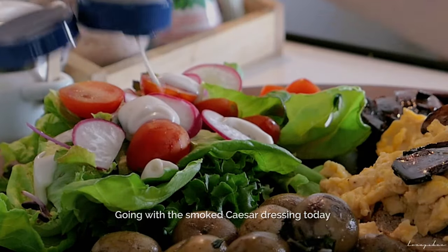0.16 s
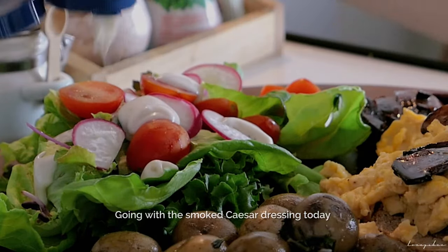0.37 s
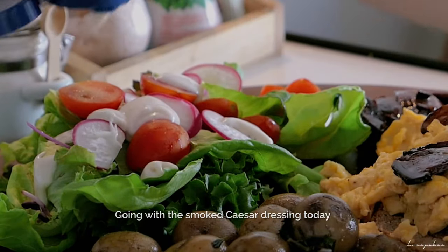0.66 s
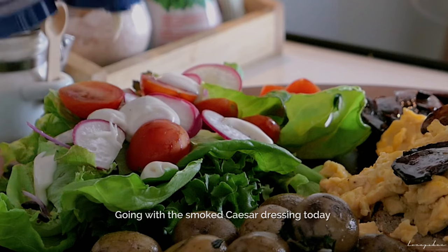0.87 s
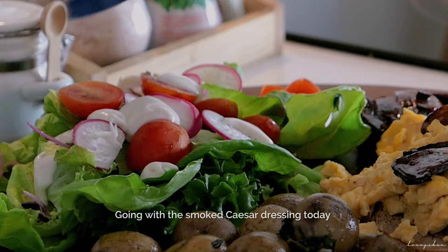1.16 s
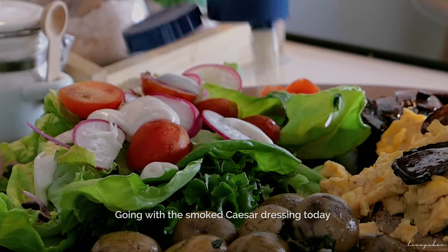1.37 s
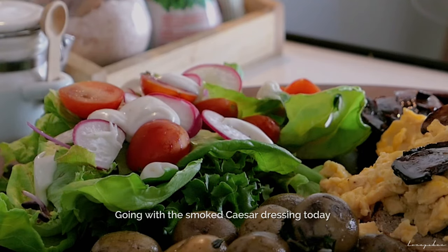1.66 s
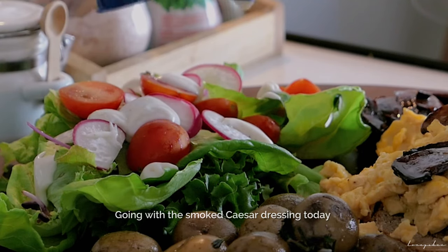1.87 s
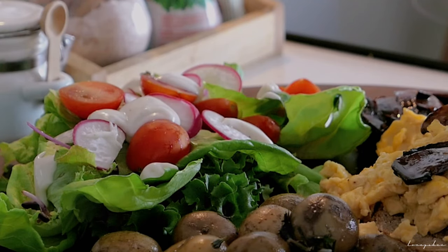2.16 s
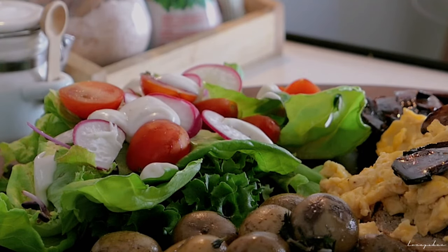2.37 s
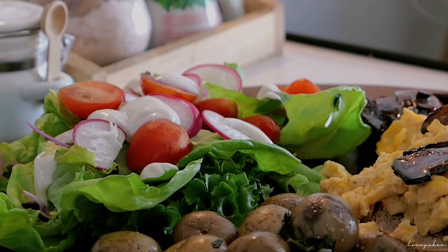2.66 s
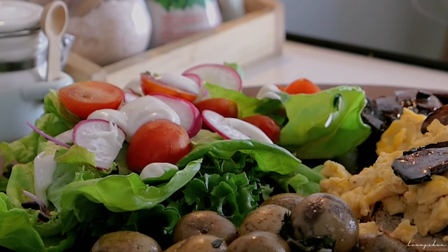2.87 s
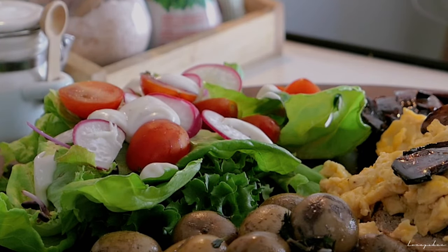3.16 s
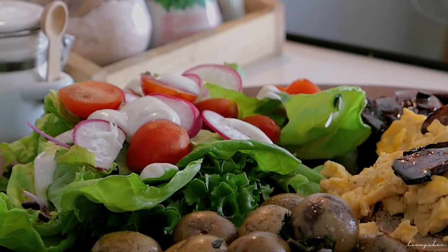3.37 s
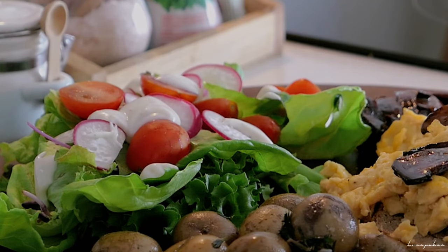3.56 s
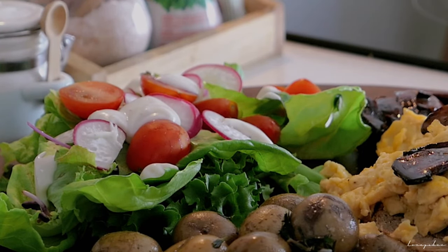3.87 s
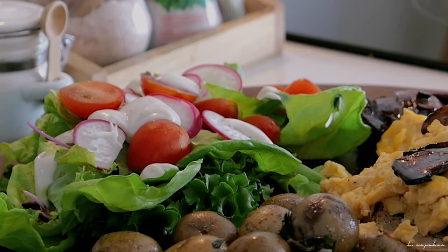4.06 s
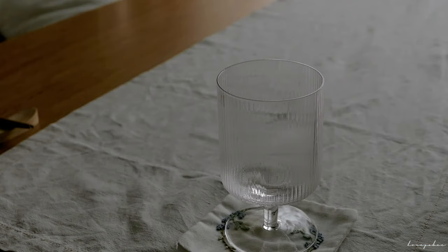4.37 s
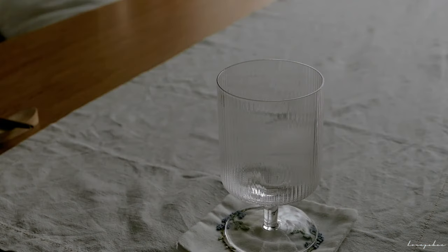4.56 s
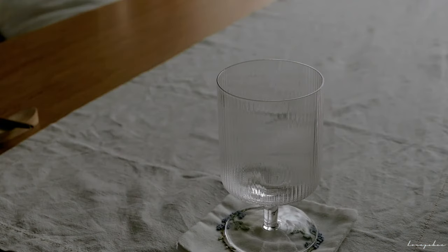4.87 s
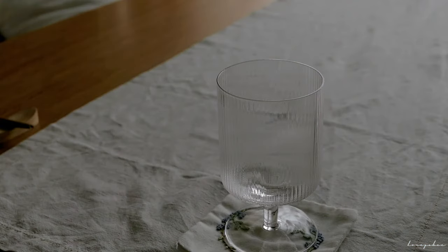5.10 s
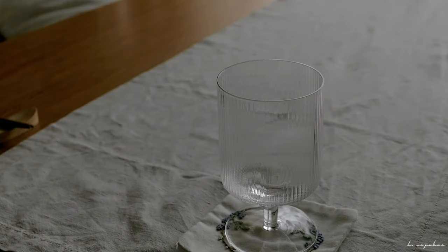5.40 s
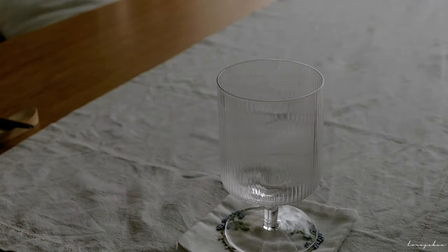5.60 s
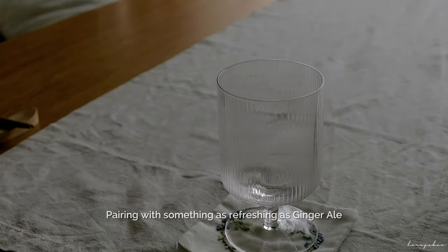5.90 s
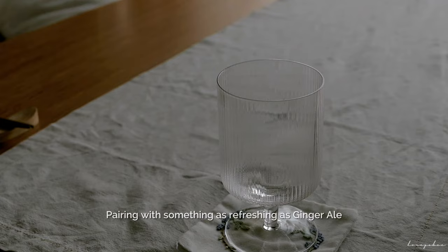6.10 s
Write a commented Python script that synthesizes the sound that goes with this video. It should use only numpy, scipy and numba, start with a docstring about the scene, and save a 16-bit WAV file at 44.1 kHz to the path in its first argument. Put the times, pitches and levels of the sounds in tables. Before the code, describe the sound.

A nearly empty squeeze bottle spits air and sauce in short wet bursts, with soft hollow thumps and one quick dish clink. The spurts thin out into a faint rustle. After two dull handling thuds, a drink can cracks open sharply, gas hisses and whistles out, the seal tears and the can knocks hollowly. Everything is close, in a hard, slightly ringing kitchen with a low fridge hum.

```python
"""Over a fridge's hum and whine, a nearly empty squeeze bottle spits air and sauce through its nozzle.
Its soft walls thump the air pocket inside, a dish clinks, and a soft rustle follows.
After two handling thuds a drink can is opened: the tab cracks the lid, gas hisses and whistles out,
the seal tears and the can knocks hollow. The hard kitchen rings on after every sharp sound."""
import sys
import numpy as np
from scipy import signal
from scipy.fft import rfft, irfft
from scipy.io import wavfile
from scipy.ndimage import uniform_filter1d
from numba import njit

SR = 44100
rng = np.random.default_rng(int(sys.argv[2]) if len(sys.argv) > 2 else 0)


def wav_record(signal):
    """Record a signal, one row per channel, as 16-bit PCM in the file named by sys.argv[1]."""
    frames = np.transpose(np.atleast_2d(signal))
    bounded = np.clip(frames, -1, 1)
    # unit amplitude maps onto the largest positive 16-bit level
    quanta = np.round(bounded * 32767).astype(np.int16)
    wavfile.write(sys.argv[1], SR, quanta)


N = 275184
T = np.arange(N) / SR


def undb(db):
    """Decibels to gain."""
    return 10 ** (np.asarray(db) / 20)


def unit(x):
    """Scale to rms 1."""
    return x / np.sqrt(np.mean(x ** 2))


def along(table, hz):
    """Interpolate a table over log frequency."""
    table_hz, values = np.transpose(table)
    return np.interp(np.log(hz), np.log(table_hz), values)


def pan(pan_db):
    """Stereo gains; pan_db is left minus right."""
    return undb([[pan_db / 2], [-pan_db / 2]])


def add(out, x, start_s, peak_db, pan_db):
    """Mix in a sound at its time, peak level and side."""
    i = int(start_s * SR)
    x = x[:N - i] / np.abs(x).max()
    out[:, i:i + len(x)] += x * undb(peak_db) * pan(pan_db)


@njit
def svf(x, hz, width_hz):
    """State-variable band-pass, gain 1 at the centre."""
    y, band_state, low_state = np.empty(len(x)), 0., 0.
    for i in range(len(x)):
        g, damping = np.tan(np.pi * hz[i] / SR), width_hz[i] / hz[i]
        v = (band_state + g * (x[i] + 1e-18 - low_state)) / (1 + g * (g + damping))
        band_state = 2 * v - band_state
        low_state += 2 * g * v
        y[i] = damping * v
    return y


def band(x, hz, width_hz):
    """Band-pass with fixed or moving centre."""
    return svf(x, np.clip(hz + 0 * x, 20, SR / 2.2), width_hz + 0 * x)


def steep(x, hz, width_hz):
    """The same band-pass twice."""
    return band(band(x, hz, width_hz), hz, width_hz)


def ring(push, modes):
    """A push sets decaying modes ringing; rms 1."""
    t = T[:len(push)]
    body = sum(undb(db) * np.sin(2 * np.pi * hz * t) * 1000 ** (-t / t60_s) for hz, db, t60_s in modes)
    return unit(signal.fftconvolve(push, body)[:len(push)])


def envelope(rise_s, fall_s, size):
    """Linear rise, exponential fall with time constant fall_s."""
    t = T[:size]
    return np.minimum(t / rise_s, 1) * np.exp(-np.maximum(t - rise_s, 0) / fall_s)


def burst(rise_s, fall_s, size):
    """Noise that swells and dies away."""
    return rng.standard_normal(size) * envelope(rise_s, fall_s, size)


def walk(rate_hz, size=N):
    """Smooth random drift, rms near 1."""
    hold = int(SR / rate_hz)
    steps = np.repeat(rng.standard_normal(N // hold + 1), hold)
    return unit(uniform_filter1d(uniform_filter1d(steps, hold), hold)[:N])[:size]


def crackle(size, per_s, jump_db, spread_db, fall_s=.0003):
    """Gain that jumps briefly at random instants."""
    hits = (rng.random(size) < per_s / SR) * undb(jump_db + spread_db * rng.exponential(size=size))
    return 1 + signal.lfilter([1], [1, -np.exp(-1 / (fall_s * SR))], hits)


# Left-right likeness of diffuse noise: freq_hz, correlation
STEREO_CORRELATION = [(60, -0.48), (200, 0.029), (640, -0.042), (1400, -0.072), (3100, 0.36), (6800, 0.66),
                      (15000, 0.37)]
def stereo_noise(spectrum):
    """Coloured noise, partly alike left and right."""
    hz = np.maximum(np.fft.rfftfreq(N, 1 / SR), 1)
    like = along(STEREO_CORRELATION, hz)
    coloured = rfft(rng.standard_normal((2, N))) * undb(along(spectrum, hz))
    mid, side = coloured * np.sqrt([1 + like, 1 - like])
    return unit(irfft(np.array([mid + side, mid - side]), N))


# Room noise near the fridge: freq_hz, density_db
AIR_NEAR_FRIDGE = [(20, -47), (70, -19.5), (134, -10.5), (200, -5), (384, -12), (600, -16.5), (988, -20),
                   (1500, -29.5), (1900, -30.5), (2500, -36), (3500, -33.5), (6500, -36), (9500, -36),
                   (12500, -39), (16000, -41.5)]
# Room noise at the table: freq_hz, density_db
AIR_AT_TABLE = [(15, -39), (25, -30), (102, -14.5), (123, -8), (170, -9), (206, -5), (309, -7.5),
                (373, -12.5), (641, -13.5), (714, -20), (887, -19), (1020, -22), (2410, -30), (3430, -35),
                (16000, -46.5)]
def room_noise(gain, move_s=4.25, fade_s=.15, rumble_hz=44.7, rumble_db=-71.5):
    """Wavering air and rumble, heard near the fridge, then at the table."""
    moved = np.clip((T - move_s) / fade_s, 0, 1)
    air = np.sqrt(1 - moved) * stereo_noise(AIR_NEAR_FRIDGE)
    air += np.sqrt(moved) * stereo_noise(AIR_AT_TABLE)
    rumble = unit(np.array([steep(noise, rumble_hz, 21) for noise in rng.standard_normal((2, N))]))
    return (gain * air + undb(rumble_db) * rumble) * undb(1.13 * walk(3.32))


# Fridge whine bands: pitch_hz, width_hz, gain_db
WHINE_BANDS = [(4430, 170, 0), (2930, 140, -7), (9960, 120, -12)]
def fridge(hum_gain, whine_gain, hum_hz=195.8, hum_width_hz=14.5):
    """A wavering hum and a flickering whine, both narrow noise bands."""
    def tone(hz, width_hz):
        return band(band(rng.standard_normal(N), hz, width_hz), hz, 2 * width_hz)

    hum = unit(tone(hum_hz, hum_width_hz)) * pan(3)
    whine = unit(sum(undb(db) * tone(hz, width_hz) for hz, width_hz, db in WHINE_BANDS))
    return hum_gain * hum + whine_gain * whine * undb(1.2 * walk(36))


# Background levels: time_s, air_db, hum_db, whine_db
BACKGROUND_LEVELS = [(0, -50.5, -56, -74), (.5, -50.5, -51.5, -72), (1.2, -47.5, -57.5, -64),
                     (1.8, -50, -55, -66), (2.3, -50, -57.5, -69.5), (2.8, -50, -57, -78),
                     (3.05, -48.5, -61.5, -69), (3.6, -50, -58, -78), (4.4, -53, -86, -71),
                     (5.4, -51.5, -64.5, -80), (6.24, -52, -63.5, -85)]
def background():
    """Room noise and fridge, drifting in level."""
    time_s, *levels_db = np.transpose(BACKGROUND_LEVELS)
    air, hum, whine = (undb(np.interp(T, time_s, db)) for db in levels_db)
    return room_noise(air) + fridge(hum, whine)


# Nozzle spurts: start_s, peak_db, centre_hz, rise_s, t60_s, pan_db, neck_db, spray_db, whistle_db
SPURTS = [(.069, -33.5, 5750, 0.0087, 0.049, 6, -9, -17, -3),
          (0.085, -32, 8900, .002, 0.048, -4, -6, -12, -6),
          (.101, -25, 7800, 0.0049, .091, -3, -15, -15, -16),
          (.42, -35.5, 5300, 0.0031, .05, 4, -28, -11, -10),
          (.443, -30.5, 6500, 0.0032, 0.093, 1, -23, -5, -19),
          (0.631, -36.5, 8760, 0.01, 0.07, 0, -6, -5, -12),
          (.644, -30, 5380, 0.0013, 0.76, -3.5, -28, -18, -14),
          (.943, -34.5, 5860, 0.00057, 0.048, 1, -2, 1, -16),
          (.953, -30.5, 8700, 0.0025, 0.034, -3, -5, -7, -6),
          (.955, -33, 8650, 0.014, 0.57, -5, -4.5, -10, -16),
          (0.969, -29, 8400, 0.0035, 0.058, 2, -10, -7, -11),
          (0.994, -31, 9600, 0.004, 0.038, 0, -10, -12, -13),
          (1.012, -28.5, 6200, 0.0017, 0.032, 0, -25, -19, -15),
          (1.0151, -21, 9400, 0.0018, 0.026, -1.5, -12.5, -20, -12),
          (1.021, -27.5, 7940, .002, 0.066, -1.5, -10, -12, -12),
          (1.12, -29, 9550, 0.0068, 0.072, -4, -7.5, -5, 0.5),
          (1.151, -32, 8200, 0.0047, 0.053, -3, -7, -15, -2), (1.4, -44, 10500, .003, .03, 1, -18, -8, -6),
          (1.4225, -22.5, 6200, 0.0026, 0.032, -3.5, -23, -13, -11),
          (1.43, -29.5, 6870, 0.0024, 0.067, -3.5, -8, -12, -3),
          (1.455, -39, 6600, .025, 0.6, -7, -22, -8, -2),
          (1.531, -34, 8100, 0.021, 0.14, -7, -5.5, -23, -23),
          (1.608, -43, 6700, 0.011, 0.072, -3, -11, -11, -21),
          (1.626, -47, 6000, .002, 0.027, -2, -14, -12, -12),
          (1.66, -50, 6440, .004, 0.045, -3, -1, -11, -12),
          (2.474, -43.5, 6600, 0.0034, 0.7, -9.5, -6, -8, -19),
          (2.604, -47, 3950, 0.0054, 0.08, 3, -3, -3, -16),
          (2.761, -54, 3000, 0.012, 0.14, 5, -11, -19, -12),
          (2.867, -47, 3800, 0.0069, 0.26, 13, -11, 3, -16),
          (3.528, -51, 3020, .008, 0.15, -2, -13, -19, -1)]
def bottle_spits(neck_hz=2900, spray_hz=13300):
    """Wet air hisses and whistles in the nozzle, rasps in the neck and throws fine spray."""
    out, size = np.zeros((2, N)), SR // 2
    for start_s, peak_db, hz, rise_s, t60_s, pan_db, neck_db, spray_db, whistle_db in SPURTS:
        puff = burst(rise_s, t60_s / np.log(1000), size)
        puff += undb(-11.5) * burst(rise_s / 2, .0038, size)  # the sauce plug bursts
        puff *= crackle(size, per_s=500, jump_db=2, spread_db=1.6)  # drops in the stream
        bands = [(hz, .92 * hz, 0), (hz, .29 * hz, whistle_db),
                 (neck_hz, 2100, neck_db), (spray_hz, 5300, spray_db)]
        spit = sum(undb(db) * unit(steep(puff, centre_hz, width_hz)) for centre_hz, width_hz, db in bands)
        add(out, spit, start_s, peak_db, pan_db)
    return out


def plop(hz, rise_s, push_s, size, loss_db_per_s=258, sag=.1, sag_s=.03):
    """Trapped air sounds a round note that dips briefly in pitch, clearest after a short push."""
    t = T[:size]
    cycles = hz * (t - sag * np.minimum(t, sag_s) ** 2 / (2 * sag_s))
    note = envelope(rise_s, push_s + .0032, size) * np.sin(2 * np.pi * cycles)
    return unit(note) * undb(-2 - loss_db_per_s * push_s)


# Hollow body modes: pitch_hz, gain_db, t60_s
BODY_MODES = [(200, -13.5, 0.075), (567, -18.5, 0.056), (803, -27, 0.13), (1190, -48, 0.037)]
# Dull thumps: bottle squeezes, then two handling thuds before the can opens:
# start_s, peak_db, pitch_hz, push_s, pan_db
DULL_THUMPS = [(.071, -35, 331, 0.019, 8), (0.103, -35, 296, 0.02, 4), (.418, -30, 344, 0.0087, 5),
               (0.423, -28, 212, 0.034, 5), (.44, -20, 386, 0.0097, 3.5), (0.445, -31.5, 222, 0.013, 1),
               (0.473, -37, 424, 0.018, 5), (0.643, -26.5, 580, 0.011, -2), (.655, -31.5, 604, 0.044, -4),
               (0.942, -38, 403, 0.0039, -6), (.954, -39, 560, .005, -8), (0.97, -33, 190, 0.013, 16),
               (1.012, -24, 370, 0.0059, 1), (1.026, -33, 222, 0.014, 0), (1.098, -40, 221, 0.015, 1),
               (1.13, -34, 158, 0.01, -6), (1.153, -34, 187, 0.012, 8), (1.421, -27, 505, 0.0028, 2),
               (1.425, -26.5, 358, 0.0045, 2), (1.424, -27.5, 209, 0.0099, 2),
               (1.503, -33, 400, 0.0019, -2), (1.526, -37.5, 198, 0.006, -8),
               (1.548, -39, 526, 0.0044, -10), (1.551, -42, 200, 0.0067, -15), (2.87, -39, 239, 0.026, 20),
               (2.871, -42, 586, .015, 16), (2.888, -35, 169, 0.021, 14), (2.894, -44.5, 815, 0.01, 12),
               (2.961, -40, 245, 0.0063, 8), (2.974, -47, 160, 0.0082, 2), (3.028, -42, 220, 0.0052, -11),
               (4.237, -36.5, 504, 0.025, 7), (4.262, -35.5, 246, 0.034, 15.5)]
def thumps(t60_s=.032):
    """Each push rings a hollow body, with a dull slap and a round note."""
    out, size = np.zeros((2, N)), SR // 3
    for start_s, peak_db, hz, push_s, pan_db in DULL_THUMPS:
        swell_s = .19 * push_s
        shove = burst(.0019 + swell_s, push_s, size)
        body = ring(shove, [(hz, 0, t60_s)] + BODY_MODES)
        slap = undb(-12.5) * unit(steep(shove, hz, 1.94 * hz))
        note = plop(hz, .0016 + swell_s, push_s, size)
        add(out, body + slap + note, start_s, peak_db, pan_db)
    return out


# Dish modes: pitch_hz, gain_db, t60_s
DISH_MODES = [(795, 0.5, 0.086), (960, -5, 0.038), (1280, 2, 0.022), (1600, -16, .04), (1617, 2.5, 0.12),
              (1870, -2, .05), (2000, 3, 0.05), (2010, -5, 0.044), (2080, -9, .04), (2270, -31, 0.027),
              (2790, -8, 0.06), (3540, -3, 0.027), (3810, -1, 0.015), (4900, -17, 0.012), (5670, 7, 0.021),
              (5950, 7.5, 0.024), (6420, -3.5, 0.036), (7000, -1, 0.033)]
# Dish strikes: start_s, peak_db, chatter_s, tick_over_chatter_db
DISH_STRIKES = [(.649, -19, 0.051, 27.5), (.692, -28, 0.018, 12), (.705, -27.5, 0.024, 19.5)]
def dish_clinks(rattle_end_s=.045):
    """A struck dish ticks, then chatters and scuffs as it rings."""
    out, size = np.zeros((2, N)), SR // 2
    for start_s, peak_db, chatter_s, tick_db in DISH_STRIKES:
        rattle = burst(.00061, chatter_s, size) / (1 + (T[:size] / rattle_end_s) ** 6)
        rattle[0] = undb(tick_db)
        scuff = undb(-14) * unit(steep(rattle, 1800, 750))
        add(out, ring(rattle, DISH_MODES) + scuff, start_s, peak_db, pan_db=-1.5)
    return out


# Rustle colour: freq_hz, density_db
RUSTLE_SPECTRUM = [(300, -9), (1200, -6), (2500, -1), (4000, -8.5), (7000, -10.5), (12000, -16.5),
                   (16000, -38)]
def rustle(start_s=2.87, rise_s=.006, settle_s=.048, fade_from_s=4.64, fall_db_per_s=33):
    """A soft, faintly resonant rustle flares, settles low and fades."""
    age_s = np.maximum(T - start_s, 0)
    level_db = -63 + 23.5 * np.exp(-age_s / settle_s) - fall_db_per_s * np.maximum(T - fade_from_s, 0)
    rub = stereo_noise(RUSTLE_SPECTRUM) + undb(-12) * unit(steep(rng.standard_normal(N), 2430, 160))
    return rub * np.minimum(age_s / rise_s, 1) * undb(level_db + 2 * walk(7.9))


# Lid modes: pitch_hz, gain_db, t60_s
LID_MODES = [(2230, -4, 0.0052), (2730, -5.5, 0.003), (4020, -10, 0.007), (4500, -16, 0.0028),
             (5370, -8, 0.0034), (6300, -4, 0.0017), (7330, -8.5, 0.0019), (8180, -11.5, 0.0048),
             (8950, -7.5, 0.0086), (11100, -15, 0.0071), (12900, -22, 0.0072)]
# Tab and seal cracks: start_s, peak_db, centre_hz, pan_db, rise_and_fall_s
TAB_CRACKS = [(4.3014, -6, 5940, -2.5, 0.00099), (4.302, -15.5, 3900, -1.5, 0.00072),
              (4.395, -23.5, 2120, 9, 0.00044), (4.3955, -26, 4530, 0, 0.00075),
              (4.600, -31.5, 4000, 8, 0.00087), (4.601, -25.5, 8650, -4, 0.0017),
              (4.611, -17.5, 7050, 4.5, 0.00053), (4.6113, -26.5, 2300, 5.5, 0.0003),
              (4.726, -33, 4000, 7, 0.00096), (4.731, -25, 6140, -5, 0.0011),
              (4.7351, -20.5, 4300, 6.5, 0.0015), (4.736, -27, 2400, 6.5, 0.0008),
              (4.756, -25, 8300, 7.5, 0.00091), (4.757, -20, 8340, 0, 0.00091),
              (4.7675, -22.5, 7440, 9, 0.0015), (4.78, -23, 7500, 4, 0.0006),
              (4.776, -24, 6600, 12, 0.00054), (4.784, -23, 7520, 3, 0.00067),
              (4.7873, -12, 8550, 3, 0.0011), (4.7886, -18.5, 2300, 14, 0.00098),
              (4.789, -17.5, 4000, 4, 0.00076), (5.238, -34, 7100, 3.5, 0.0012),
              (5.239, -40, 2460, 7, 0.0017), (5.411, -43.5, 3220, 0.5, 0.00055)]
def can_cracks(break_db=14):
    """The tab and tearing seal snap; the lid rings and the wall answers dully."""
    out = np.zeros((2, N))
    for start_s, peak_db, hz, pan_db, rise_s in TAB_CRACKS:
        snap = burst(rise_s, rise_s, SR // 20)
        snap[int(rise_s * SR)] = undb(break_db)  # clean break atop the splintering
        lid = ring(steep(snap, hz, .6 * hz), LID_MODES)
        click = undb(-7.5) * unit(steep(snap, hz, .88 * hz))
        treble = undb(-11) * unit(steep(snap, 10400, 13500))
        wall = undb(-18.5) * unit(steep(snap, 1140, 1300))
        add(out, lid + click + treble + wall, start_s, peak_db, pan_db)
    return out


# Gap stages: start_s, level_db, fall_db_per_s, hiss_hz, low_hz, low_re_hiss_db, high_hz, high_re_hiss_db
GAS_GAPS = [(4.297, -37.5, 20, 12300, 4300, -21, 8800, -17),
            (4.395, -48.5, 31, 5300, 2020, -4.5, 4380, -6.5), (4.611, -46, 110, 7950, 5020, -4, 8000, -8),
            (4.727, -54, -330, 5860, 4330, -5.5, 7950, -8),
            (4.788, -42.5, 10.5, 3800, 2700, -15, 8570, -26),
            (5.24, -54.5, 191, 5300, 2800, -16, 4430, -18.5)]
def gas_jet(rise_s=.0021, release_s=.013, fade_db_per_s2=130.5, sag_octaves_per_s=5.315, width_hz=700):
    """Frothy gas hisses through a gap with two wandering whistles; cracks reshape the gap."""
    out, size = np.zeros(N), SR * 3 // 4
    age_s = T[:size]
    ends_s = [gap[0] for gap in GAS_GAPS[1:]] + [N / SR]
    for gap, end_s in zip(GAS_GAPS, ends_s):
        start_s, level_db, fall_db_per_s, hiss_hz, low_hz, low_db, high_hz, high_db = gap
        open_s = np.minimum(age_s, end_s - start_s)
        flow = undb(level_db - fall_db_per_s * open_s - fade_db_per_s2 * open_s ** 2)  # pressure runs out
        flow *= np.minimum(age_s / rise_s, 1) * np.exp(-(age_s - open_s) / release_s)
        froth = unit(crackle(size, per_s=900, jump_db=-1, spread_db=1))
        jet = rng.standard_normal(size) * flow * froth * undb(1.2 * walk(57.5, size))
        hz = hiss_hz * 2 ** (-sag_octaves_per_s * age_s)
        # The roots offset the power a wider band passes.
        sound = steep(jet, hz, 3.42 * hz) * np.sqrt(SR / (3.2 * hz))
        for pitch_hz, gain_db in [(low_hz, low_db), (high_hz, high_db)]:
            whistle = steep(jet, pitch_hz * (1 + .025 * walk(40, size)), width_hz)
            sound += whistle * np.sqrt(SR / width_hz) * undb(gain_db + 3 * walk(91, size))
        i = int(start_s * SR)
        out[i:i + size] += sound
    return out


def lid_song(start_s=4.68, rise_s=.19, pitch_hz=2880, width_hz=140, fall_db_per_s=51):
    """The open lid sings narrowly in the last of the gas."""
    age_s = np.maximum(T - start_s, 0)
    tone = unit(steep(rng.standard_normal(N), pitch_hz, width_hz))
    return tone * np.minimum(age_s / rise_s, 1) * undb(-42 - fall_db_per_s * age_s + 3 * walk(30))


# Hollow can modes: pitch_hz, gain_db, t60_s
CAN_MODES = [(244, -5, 0.056), (295, 6, 0.04), (477, -17, 0.035), (498.5, 1.5, 0.069), (520, 3.5, 0.0081),
             (680, -11, 0.028), (844, -10.5, 0.021), (898, -15.5, 0.038), (960, -9, 0.031),
             (1065, -10.5, 0.025), (1380, -12.5, .04)]
# Blows to the can: start_s, peak_db, centre_hz, push_s, pan_db
CAN_BLOWS = [(4.787, -26.5, 808, 0.0019, 12), (4.792, -27, 920, 0.027, -4), (4.798, -21.5, 540, 0.0066, 5),
             (4.798, -29.5, 295, 0.0044, 3), (4.826, -35, 910, 0.1, -1), (4.828, -39, 277, .04, 4),
             (4.82, -37.5, 517, 0.037, 0), (4.923, -38, 286, 0.051, 4), (5.049, -43, 1040, 0.16, -11),
             (5.05, -41, 834, 0.023, 5), (5.238, -48.5, 870, .01, 4), (5.371, -32.5, 479, 0.0029, 3),
             (5.38, -31.5, 496, 0.0085, -17), (5.382, -36.5, 281, 0.012, 0), (5.379, -41, 1390, 0.0078, -9)]
def can_knocks():
    """Each blow thuds, rings the hollow body and sounds the trapped air."""
    out, size = np.zeros((2, N)), SR // 2
    for start_s, peak_db, hz, push_s, pan_db in CAN_BLOWS:
        blow = steep(burst(.00072, push_s, size), hz, .41 * hz)
        thud = undb(-9.5) * unit(blow)
        note = undb(-5.5) * plop(hz, .0024, push_s, size)
        add(out, ring(blow, CAN_MODES) + thud + note, start_s, peak_db, pan_db)
    return out


def worktop_scatter(x, fall_s=.003, level_db=-11.5):
    """Treble scatters off the worktop and jars, opposite in sign left and right."""
    echoes = band(burst(.00013, fall_s, SR // 40), 12700, 6900)
    echoes /= np.sqrt(np.sum(echoes ** 2))
    side = undb(level_db) * signal.fftconvolve(x.mean(axis=0), echoes)[:N]
    return np.array([side, -side])


# Kitchen decay: freq_hz, t60_s
ROOM_DECAY = [(100, 0.31), (500, 0.29), (1500, 0.55), (2300, 0.65), (6000, 0.36), (16000, 0.087)]
def room_tail(x, level_db=-10, shared=.46, rise_s=.0032):
    """A diffuse tail, partly alike left and right, whose top treble dies first."""
    t = T[:SR]
    tail = 0
    for hz in 100 * 2 ** np.arange(0, 7.5, .5):
        common, left, right = (band(rng.standard_normal(SR), hz, hz / 3) for _ in range(3))
        decay = 1000 ** (-t / along(ROOM_DECAY, hz)) * np.minimum(t / rise_s, 1)
        tail = tail + decay * (shared * common + (1 - shared) * np.array([left, right]))
    tail /= np.sqrt(np.sum(tail ** 2) / 2)
    return undb(level_db) * signal.fftconvolve(x.mean(axis=0)[None], tail, axes=1)[:, :N]


def scene():
    """Bottle, dish and can with their reflections, over the background and rustle."""
    near = bottle_spits() + thumps() + dish_clinks()
    near += can_cracks() + (gas_jet() + lid_song()) * pan(1.2) + can_knocks()
    low_cut = signal.butter(2, 153, "high", fs=SR, output="sos")  # thins the bass of the close sounds
    near = signal.sosfilt(low_cut, near)
    return near + worktop_scatter(near) + room_tail(near) + background() + rustle()


def record(dry):
    """Steep low-pass at 15.8 kHz."""
    return signal.sosfilt(signal.ellip(10, .2, 70, 15800, fs=SR, output="sos"), dry)


dry = scene()
out = record(dry)
wav_record(out)
```